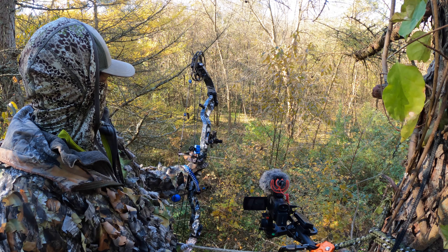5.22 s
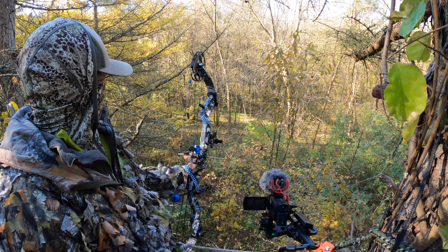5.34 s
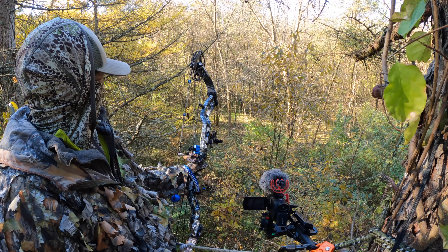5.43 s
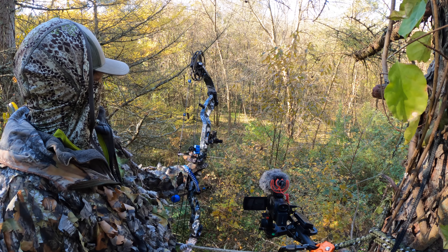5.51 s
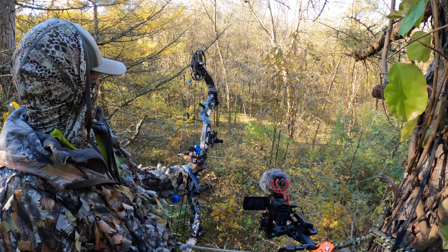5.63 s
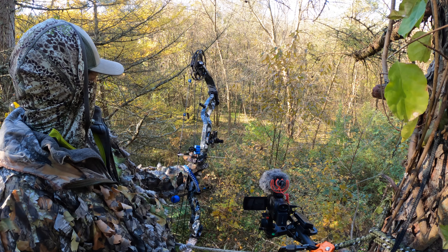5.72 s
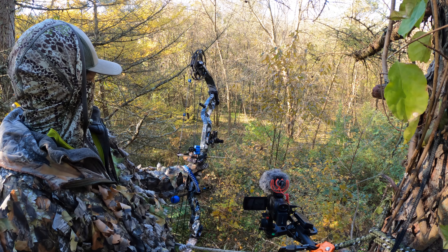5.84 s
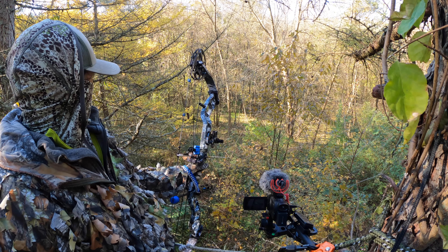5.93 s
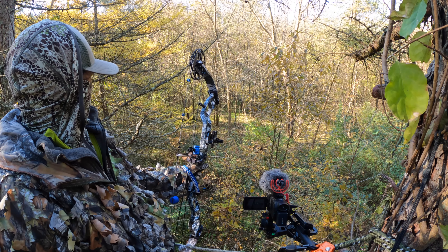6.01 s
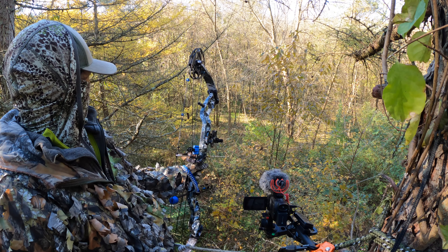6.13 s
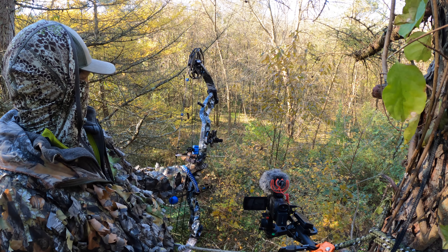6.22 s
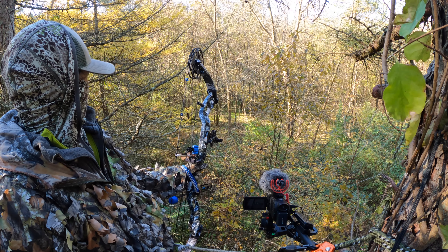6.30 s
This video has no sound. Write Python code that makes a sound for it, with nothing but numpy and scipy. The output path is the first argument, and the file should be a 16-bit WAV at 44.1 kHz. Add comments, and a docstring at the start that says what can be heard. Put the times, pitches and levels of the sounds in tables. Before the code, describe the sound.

Distant twin-engine plane hums deep and wavering above a quiet wood, with soft hiss, wind bumps, faint bird chips and a late cloth rustle.

```python
"""A propeller airplane drones far overhead in a wood: pairs of sines at multiples of the blade rate sink in pitch
and beat as two engines slip out of phase. Random spectra make its roar, which swells, blooms and throbs, and a
smooth bright background hiss. Low filtered noise is wind buffeting the microphones. A small bird chips in swept
sines, dry twigs tick in band-passed bursts, and both ring on in a scattered tail. Near the end cloth rustles,
as bright noise roughened by a crackle, with a cluster of the same band-passed bursts."""
import sys
import numpy as np
from scipy import signal
from scipy.fft import rfft, irfft
from scipy.io import wavfile
from scipy.ndimage import uniform_filter1d

SR = 44100
rng = np.random.default_rng(int(sys.argv[2]) if len(sys.argv) > 2 else 0)


def output_pcm(signal):
    """Save a mono or channel-first signal as 16-bit PCM at the path in sys.argv[1].

    Samples are clipped to [-1, 1] before scaling.
    """
    pcm = np.clip(np.atleast_2d(signal).T, -1, 1) * 32767
    wavfile.write(sys.argv[1], SR, np.round(pcm).astype(np.int16))


def field_ratio(decibels):
    """Amplitude ratio for a level in dB (20 dB per decade); scalars and array-likes work."""
    return 10 ** (np.asarray(decibels, dtype=float) / 20)


N = 280917  # samples

# blade passing rate, sinking as the plane draws by: [t/s, f/Hz]
BLADE_RATE = [(0.0, 89.82), (0.91, 89.5), (1.82, 88.64), (2.73, 88.64), (3.64, 87.36), (4.55, 86.64),
              (5.46, 85.88), (6.37, 84.9)]
# swell of the engine and slipstream roar: [t/s, relative level/dB]
ROAR_SWELL = [(0.0, -47.5), (1.49, -46.5), (2.2, -48.5), (2.4, -46), (2.68, -43.5), (3.05, -46),
              (3.25, -42), (3.73, -45), (4.1, -44), (4.3, -44), (4.52, -40.5), (4.63, -36), (4.85, -40.5),
              (5.3, -46.5), (5.71, -42), (5.96, -42), (6.37, -38.5)]
# level difference of the microphones: [f/Hz, left minus right level/dB]
MIC_BALANCE = [(60, -1.5), (150, -1), (360, -1), (870, -2.5), (2140, -3.5), (5220, -1.5), (12800, -4.5)]
# phase difference of the microphones: [f/Hz, lead of the left/rad]
MIC_LEAD = [(60, -0.064), (170, 0.033), (860, 0.42), (1640, 0.48), (3000, 0.99), (5000, 0.1)]


def evened(x):
    """Normalization: scales a signal to unit rms."""
    return x / np.sqrt(np.mean(x ** 2) + 1e-20)


def read(points, hz):
    """Spectral interpolation: reads a curve on a logarithmic frequency axis."""
    f, value = np.transpose(points)
    return np.interp(np.log(hz + 1), np.log(f + 1), value)


def follow(rows, t):
    """Linear interpolation in time: reads every column of a curve table at the times t."""
    s, *columns = np.transpose(rows)
    return [np.interp(t, s, column) for column in columns]


def add(mix, s, sound):
    """Superposition: adds a sound to the mix from the time s on, cut at the end of the mix."""
    part = mix[:, round(s * SR):][:, :sound.shape[1]]
    part += sound[:, :part.shape[1]]


def sides(db):
    """Interaural level difference: splits it evenly into a left and a right gain."""
    return field_ratio(np.array([db / 2, -db / 2]))


def slow_noise(shape, width):
    """Low-pass random modulation: white noise averaged twice over width samples, at unit rms."""
    once = uniform_filter1d(rng.standard_normal(shape), width)
    return evened(uniform_filter1d(once, width))


def noise(field_db, size, patchy_db, patch_hz, patch_s):
    """Short-time synthesis of partly coherent noise: random spectra under a dB field of (Hz, s), in patches."""
    # likeness of the microphones: [f/Hz, coherence 0-1]
    likeness = [(60, 0.97), (150, 1), (360, 0.97), (870, 0.89), (2140, 0.67), (5220, 0.55), (12800, 0.6)]
    hop = size // 4
    frames = N // hop + 5
    hz = np.fft.rfftfreq(size, 1 / SR)[:, None]
    t = (np.arange(frames) * hop / SR)[None]
    a, b, c, d, patches = rng.standard_normal((frames, len(hz), 5)).T
    for _ in range(2):
        patches = uniform_filter1d(patches, max(int(patch_hz * size / SR), 1), 0)
        patches = uniform_filter1d(patches, max(int(patch_s * SR / hop), 1), 1)
    same = read(likeness, hz)
    left, unrelated = a + 1j * b, c + 1j * d
    right = same * left + np.sqrt(1 - same ** 2) * unrelated
    spectra = np.array([left, right * np.exp(-1j * read(MIC_LEAD, hz))])
    spectra *= sides(read(MIC_BALANCE, hz))
    spectra *= field_ratio(field_db(hz, t) + patchy_db * evened(patches))
    return signal.istft(spectra, nperseg=size, noverlap=size - hop)[1][:, :N] / size


def hiss():
    """Background noise floor: smooth bright hiss with a light flicker, sinking a few dB as the plane grows louder."""
    # [t/s, relative level/dB]
    hiss_curve = [(0.0, -75.5), (4.1, -77.5), (4.6, -79.5), (6.37, -78)]
    # [f/Hz, relative spectral level/dB]
    hiss_colour = [(800, -23.5), (2500, -6.5), (4000, -2), (6000, -3), (7800, -5), (8300, -10.5),
                   (10000, -13), (12000, -17.5), (12600, -19), (13300, -38.5), (14500, -58.5)]

    def field_db(hz, t):
        return read(hiss_colour, hz) + follow(hiss_curve, t)[0]
    return field_ratio(50) * noise(field_db, size=256, patchy_db=1.0, patch_hz=3000, patch_s=.015)


def wind():
    """Wind pressure at the microphones: lumpy low noise, stronger at the left and partly unrelated at the right."""
    # strength of the wind: [t/s, level/dB before lumps and balance]
    wind_curve = [(0.0, -48), (.9, -57), (1.3, -56), (2.55, -53), (2.67, -35), (2.9, -55), (3.23, -41.5),
                  (3.53, -46), (3.8, -33), (4.3, -35.5), (4.85, -34.5), (4.95, -41), (5.2, -28.5),
                  (5.42, -62), (5.9, -40.5), (6.37, -41.5)]
    # [f/Hz, relative spectral level/dB]
    wind_colour = [(2, -23.5), (8, -19), (18, 0.5), (35, 6.5), (60, 0.5), (85, -14), (200, -45),
                   (600, -120)]
    lumps_db = 3  # rms
    padded = N + 83  # a quick transform length
    gain = field_ratio(read(wind_colour, np.fft.rfftfreq(padded, 1 / SR)))
    white = rng.standard_normal((2, padded))
    main, other = evened(irfft(rfft(white) * gain)[:, :N])
    level = field_ratio(follow(wind_curve, np.arange(N) / SR)[0] + lumps_db * slow_noise(N, 1400))
    return level * sides(5.5)[:, None] * np.array([main, .97 * main + .25 * other])


def rustle():
    """Frictional noise: rubbing cloth is bright clumpy noise, roughened by random impulses of its fibres."""
    # [f/Hz, relative spectral level/dB]
    rustle_colour = [(1500, -15), (3500, -8.5), (5500, -10.5), (9000, -23), (12500, -25), (14000, -50)]
    peak_s, peak_db = 6.285, -62  # moment and relative level of the height
    rise_s, fall_s = .022, .035  # distance from the height at which 1 dB is lost

    def field_db(hz, t):
        span = np.where(t < peak_s, rise_s, fall_s)
        return read(rustle_colour, hz) + np.maximum(peak_db - ((t - peak_s) / span) ** 2, -200)
    fibres = field_ratio(2.5 * rng.exponential(1, N)) * (rng.random(N) < 200 / SR)  # about 200 a second
    crackle = .8 + signal.lfilter([.2], [1, -.985], fibres)  # each impulse dies away
    return field_ratio(46) * crackle * noise(field_db, size=128, patchy_db=5.0, patch_hz=1800, patch_s=.006)


def wood(x):
    """Multiple scattering: trunks and leaves return a sound as a sparse, exponentially decaying tail."""
    length, t60 = SR // 2, 0.37  # samples, s
    at = np.arange(150, length - 20, 20)
    at = at + rng.integers(0, 20, (2, len(at)))
    taps = np.zeros((2, length))
    np.put_along_axis(taps, at, rng.choice([-1., 1.], at.shape), 1)
    taps *= field_ratio(-60 * np.arange(length) / SR / t60)
    return signal.fftconvolve(x, taps / np.linalg.norm(taps[0]), axes=1)[:, :N]


def ticks():
    """Transient excitation: short events are decaying noise bursts in bands of their own, slightly to the right."""
    # dry twigs tick; the burst at 5.887 s is the sharp falling end of a bird chip,
    # and the cluster from 6.2 s on is the crackle of the rustle:
    # [t/s, peak level/dB before balance, low edge f/Hz, high edge f/Hz, burst decay t60/s]
    tick_list = [(1.831, -50, 4500, 7500, 0.011), (3.326, -51, 6000, 10100, 0.011),
                 (3.736, -51, 4400, 5600, .03), (3.87, -50, 5800, 11850, 0.014),
                 (3.877, -43, 3300, 7900, 0.008), (5.148, -51, 3700, 4960, 0.043),
                 (5.649, -49.5, 4400, 5730, 0.03), (5.887, -49, 4500, 6800, 0.009),
                 (5.96, -43.5, 3300, 7900, .006), (6.218, -56, 3500, 8540, 0.0057),
                 (6.263, -45, 4300, 5960, .03), (6.289, -46, 3500, 10600, .008),
                 (6.211, -60, 4970, 10500, .005), (6.301, -52, 4500, 6982, .025),
                 (6.331, -42, 3200, 5370, .02)]
    out = np.zeros((2, N))
    t = np.arange(1500) / SR
    for s, db, low_hz, high_hz, t60 in tick_list:
        band = signal.butter(4, [low_hz, high_hz], "band", fs=SR, output="sos")
        burst = rng.standard_normal(len(t)) * field_ratio(-60 * t / t60)
        tick = signal.sosfilt(band, burst)
        add(out, s, field_ratio(db) * sides(-2.5)[:, None] * tick / abs(tick).max())
    return out + field_ratio(-13.5) * wood(out)


def bird():
    """Frequency modulation: each chip sweeps up towards a plateau, flutters in level and drops steeply at its end."""
    # [t/s, start f/Hz, plateau f/Hz, length/s, level/dB before envelope and balance]
    chip_list = [(0.363, 6540, 7650, .05, -59.5), (0.636, 7080, 7740, 0.082, -56),
                 (1.222, 6640, 7360, 0.049, -59.5), (2.52, 6900, 7800, 0.017, -60.5),
                 (3.377, 6800, 8220, 0.081, -55.5), (3.465, 6200, 7650, 0.03, -49),
                 (3.583, 6500, 7790, 0.055, -52), (3.658, 6100, 7480, 0.041, -50.5),
                 (5.833, 6580, 7460, 0.053, -58), (5.88, 6720, 7400, 0.05, -59)]
    rise_share = .27  # time constant of the sweep as a share of the chip's length
    out = np.zeros((2, N))
    for s, start_hz, top_hz, length, db in chip_list:
        t = np.arange(0, length, 1 / SR)
        drop_hz = 3000 * np.exp((t - length) / .003)
        hz = top_hz - (top_hz - start_hz) * np.exp(-t / (rise_share * length)) - drop_hz
        attack = np.minimum(t / 0.0063, 1)
        release = np.minimum((length - t) / 0.0027, 1)
        shape = attack * release * field_ratio(-200 * t)
        flutter = 1 + 0.16 * np.sin(2 * np.pi * (45 * t + rng.random()))
        tone = np.sin(2 * np.pi * np.cumsum(hz) / SR) * np.sqrt(2)
        add(out, s, field_ratio(db) * sides(-1)[:, None] * shape * flutter * tone)
    return out + field_ratio(2.0) * wood(out)


def roar():
    """Amplitude-modulated turbulence noise: it swells, blooms in patches, and is chopped once a blade pass."""
    # [f/Hz, relative spectral level/dB]
    roar_colour = [(20, -24), (60, 29), (110, 26.5), (200, 20.5), (400, 11), (520, 9.5), (610, 13),
                   (750, 5.5), (1100, 7), (2000, -1), (3000, -11.5), (5000, -30), (9000, -75),
                   (14000, -120)]
    # brief rises of parts of the spectrum: [centre t/s, centre f/Hz, length/s, width/octave, gain/dB]
    bloom_list = [(2.374, 1450, 0.15, 0.18, 12), (2.685, 1110, 0.074, 0.72, 3.5),
                  (3.284, 924, 0.13, 0.11, 6.5), (4.084, 1940, 0.091, 0.43, 8), (4.72, 2000, 0.12, 0.62, 1),
                  (5.734, 980, 0.24, 0.11, 5.5), (5.648, 2000, 0.13, 0.47, 4),
                  (6.044, 1940, 0.018, 0.21, 13.5)]
    # throb at the blade rate: [t/s, depth 0-1]
    chop_depth = [(0, 0), (3, 0), (4.5, 0.14), (6.37, 0.11)]

    def field_db(hz, t):
        swell_db = follow(ROAR_SWELL, t)[0]
        mean_db = np.mean(swell_db)
        octave = np.log2(hz + 1)
        reach = np.clip((octave - np.log2(90)) / 2.1, .3, 1)  # the bass swells less than the middle
        blooms = sum(gain_db * np.exp(-((t - s) / length) ** 2 - ((octave - np.log2(f)) / width) ** 2)
                     for s, f, length, width, gain_db in bloom_list)
        return read(roar_colour, hz) + mean_db + reach * (swell_db - mean_db) + blooms
    t = np.arange(N) / SR
    blade_phase = 2 * np.pi * np.cumsum(follow(BLADE_RATE, t)[0]) / SR
    chop = 1 + follow(chop_depth, t)[0] * np.cos(blade_phase)
    return field_ratio(39.5) * chop * noise(field_db, size=2048, patchy_db=1.85, patch_hz=250, patch_s=.12)


def propeller():
    """Beating of blade harmonics: sines of two engines interfere, trembling a little in the moving air."""
    # multiples of the blade rate, the three loudest orders first: [multiple]
    orders = (1, 2, 3, 1.5, 4, 5, 6, 7, 2.5, 3.5, 4.5, 4.25)
    # second engine, a row per order: [amplitude share of the first, t/s of one cancellation]
    second_engine = [(0.63, 2.65), (0.62, 4.496), (0.89, 4.13), (1, 3.09), (0.59, 4.4), (0.23, 4.4),
                     (1, 3.73), (0.72, 3.7), (.8, 4.07), (0.64, 4.34), (0.43, 4.28), (0.26, 2.1)]
    # three loudest orders of the first engine before trembling and balance: [t/s, level/dB, level/dB, level/dB]
    loud_levels = [(0.0, -37, -45, -49), (0.8, -38, -40, -48), (1.4, -35, -44.5, -64),
                   (1.9, -33, -39, -50.5), (2.4, -33.5, -32, -40.5), (2.9, -30.5, -31, -39),
                   (3.5, -30.5, -39.5, -45), (4.2, -30.5, -39, -40.5), (4.8, -35.5, -43, -38),
                   (5.3, -38.5, -45.5, -40.5), (5.8, -42, -37.5, -35), (6.37, -39.5, -30.5, -37)]
    # the other orders ride on the swells of the roar and carry best at one moment of the pass:
    # [level/dB before swell and carry, reach/dB per dB of roar, best t/s, time to lose 6 dB/s]
    weak_levels = [(-50, -0.3, 2.85, 0.5), (-52, 1, 4.9, 7), (-58, 1.6, 4.9, 4), (-54.5, 0.84, 3.8, 1.44),
                   (-60, 1, 6.1, 6), (-60, .2, 3.5, 4), (-55.5, .5, 5.3, 3), (-56.5, 0.9, 0.48, 3),
                   (-55.5, .4, 4.4, 1.5)]
    beat_hz = .245  # the second blade rate is this much slower, so order k beats k times as fast
    faintest_db = -9.5  # limit of the loss away from the best moment
    t = np.arange(N) / SR
    hz, = follow(BLADE_RATE, t)
    turns = np.cumsum(hz) / SR
    swell_db = follow(ROAR_SWELL, t)[0]
    swell_db = swell_db - np.mean(swell_db)
    levels = follow(loud_levels, t)
    for db, reach, best_s, span in weak_levels:
        carry_db = np.maximum(-6 * ((t - best_s) / span) ** 2, faintest_db)
        levels.append(db + reach * swell_db + carry_db)
    out = np.zeros((2, N))
    for k, db, (share, null_s) in zip(orders, levels, second_engine):
        order_hz = k * hz.mean()
        phase_tremble, level_tremble = slow_noise((2, N), 2500)
        phase = 2 * np.pi * (k * turns + rng.random()) + .07 * k * phase_tremble
        lag = np.array([[0], [read(MIC_LEAD, order_hz)]])
        tremble_db = (-0.14 + 0.23 * k) * level_tremble  # high orders scintillate more
        level = field_ratio(uniform_filter1d(db, 3000) + tremble_db) * np.sqrt(2)
        slip = 2 * np.pi * k * beat_hz * (t - null_s)
        pair = np.cos(phase - lag) - share * np.cos(phase - lag - slip)
        out += level * sides(read(MIC_BALANCE, order_hz))[:, None] * pair
    return out


def scene():
    """Linear superposition of all sources at the two microphones."""
    return hiss() + wind() + rustle() + ticks() + bird() + roar() + propeller()


def low_pass(x):
    """Removes everything above the highest recorded frequency."""
    return signal.sosfilt(signal.butter(12, 13360, fs=SR, output="sos"), x)


def record(dry):
    """Signal chain: passes the finished mix of both microphones to its last stage."""
    return low_pass(dry)


dry = scene()
out = record(dry)
output_pcm(out)
```